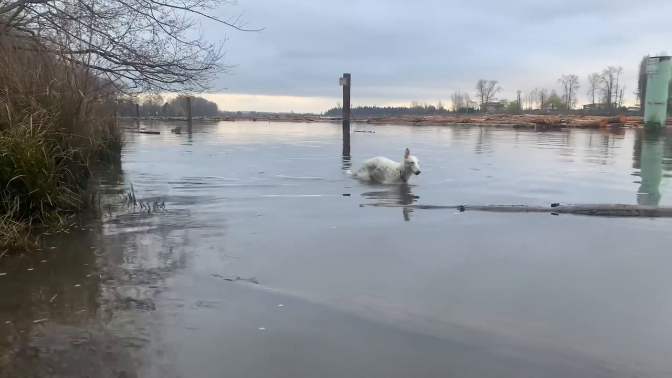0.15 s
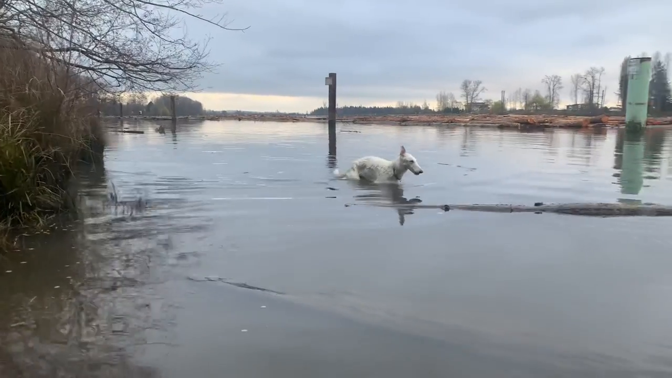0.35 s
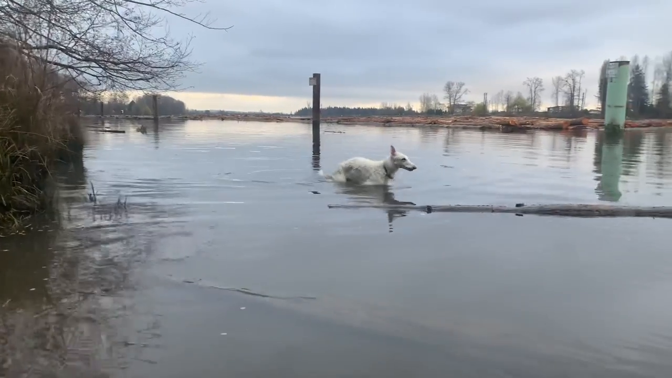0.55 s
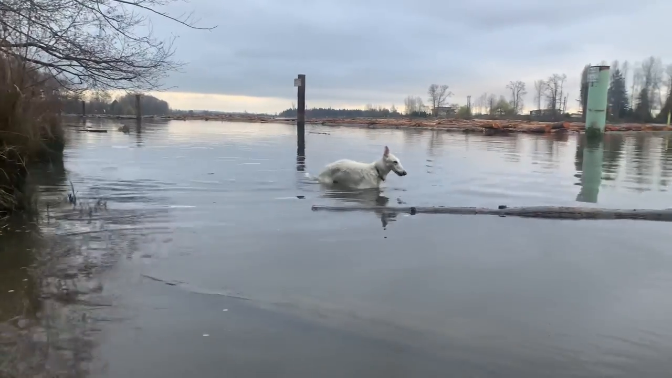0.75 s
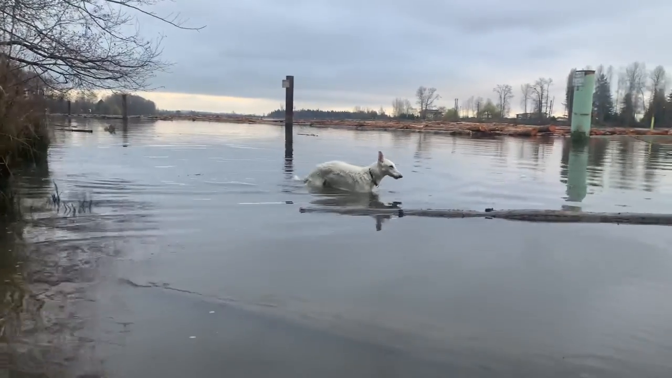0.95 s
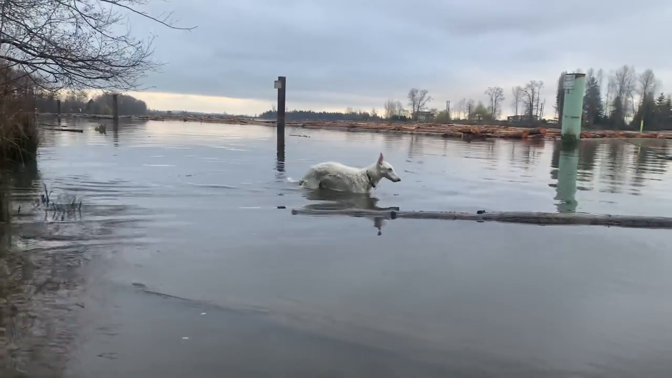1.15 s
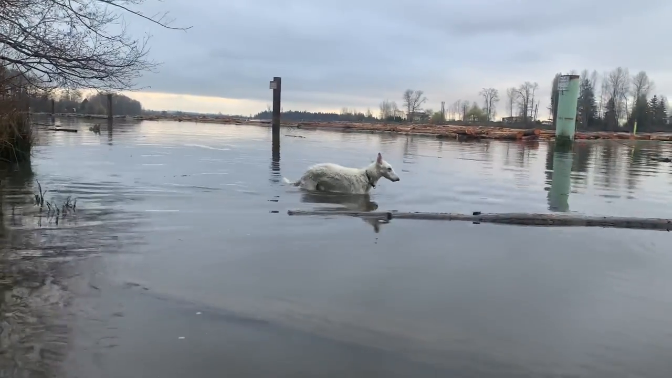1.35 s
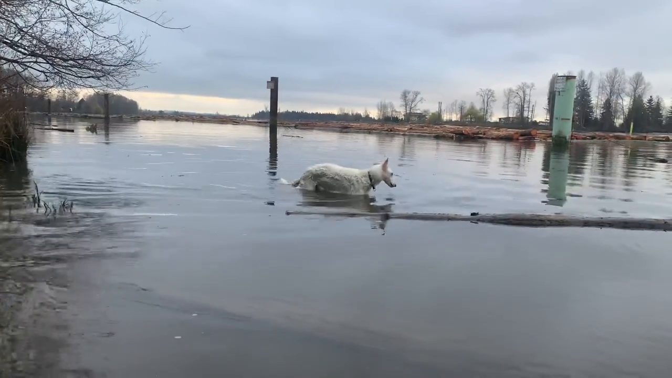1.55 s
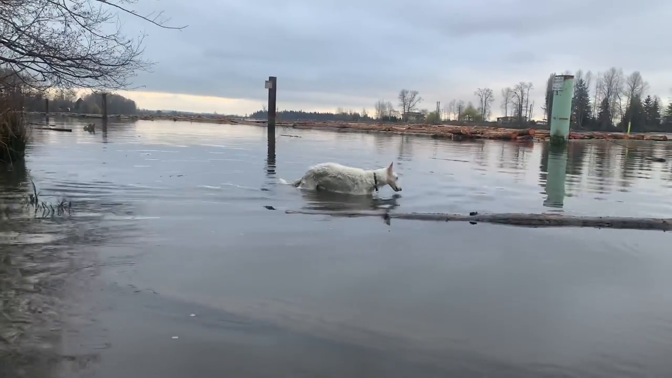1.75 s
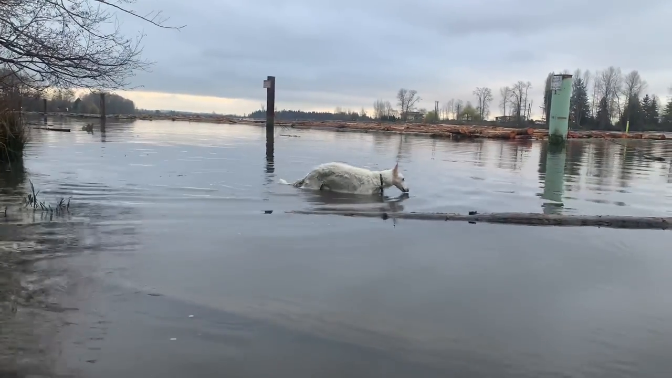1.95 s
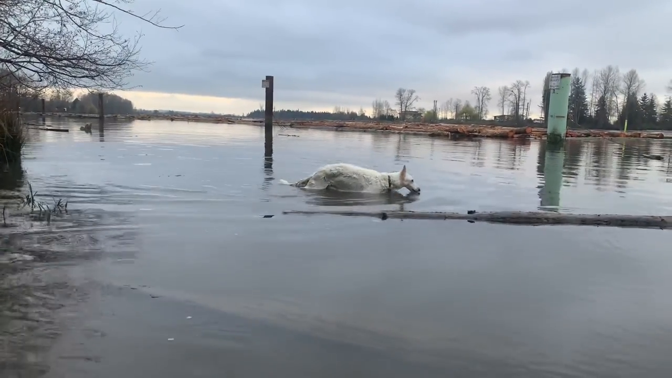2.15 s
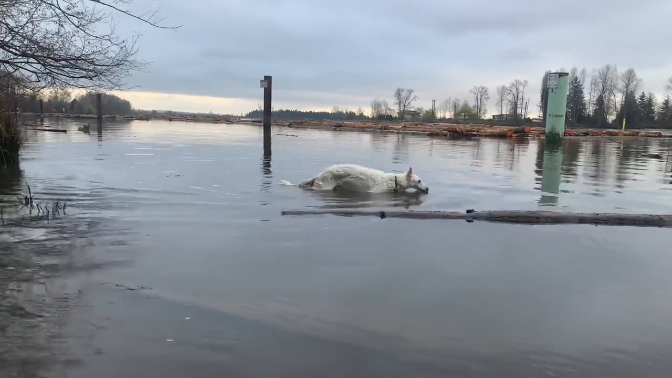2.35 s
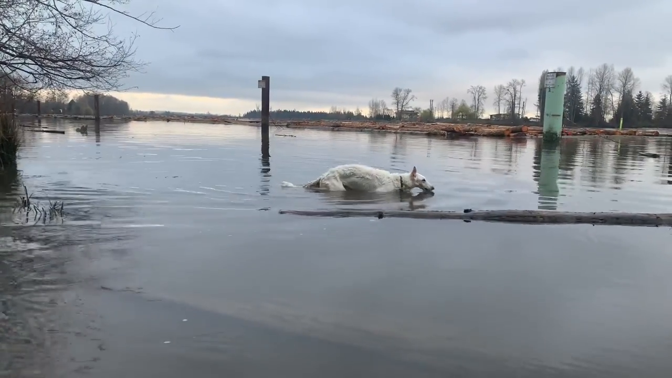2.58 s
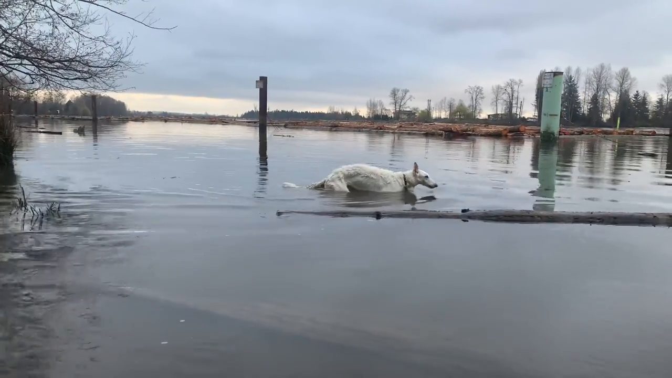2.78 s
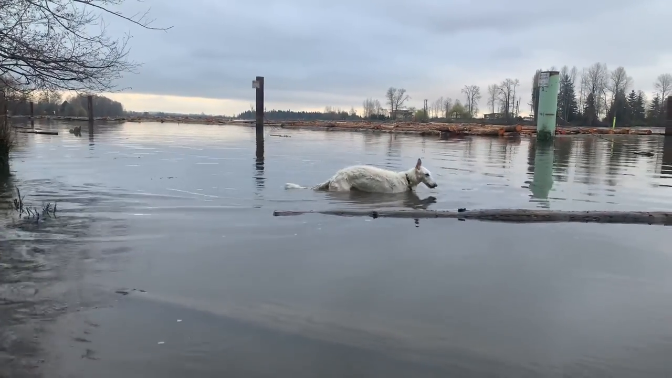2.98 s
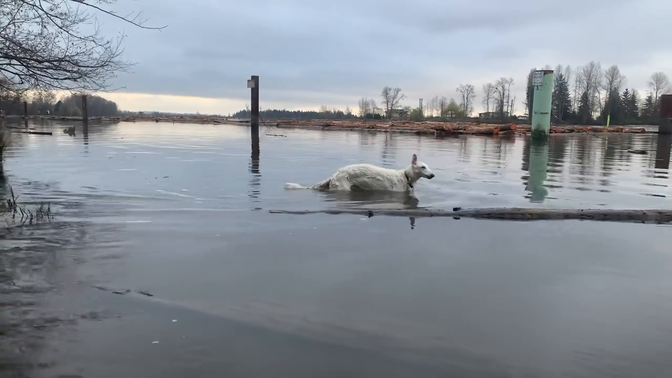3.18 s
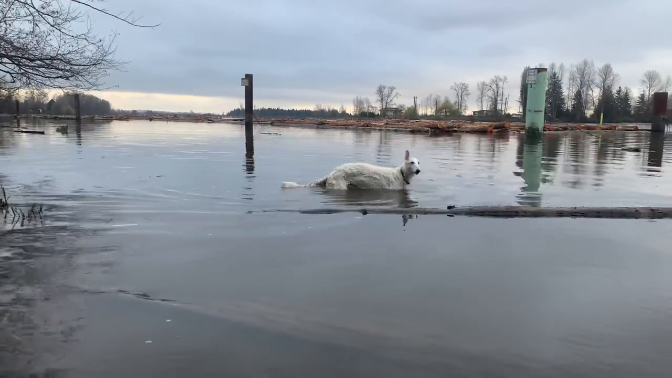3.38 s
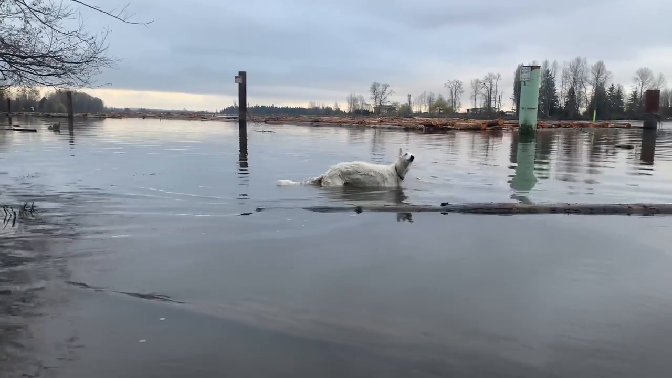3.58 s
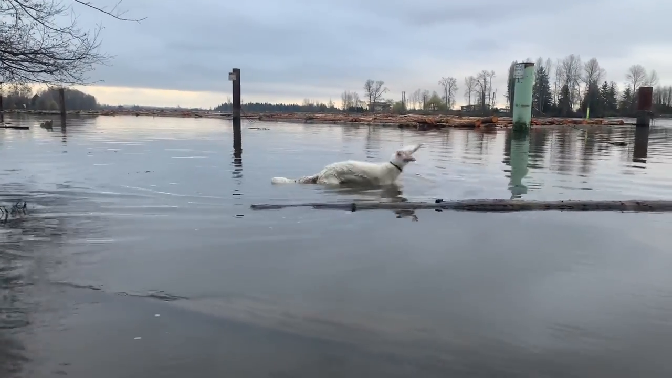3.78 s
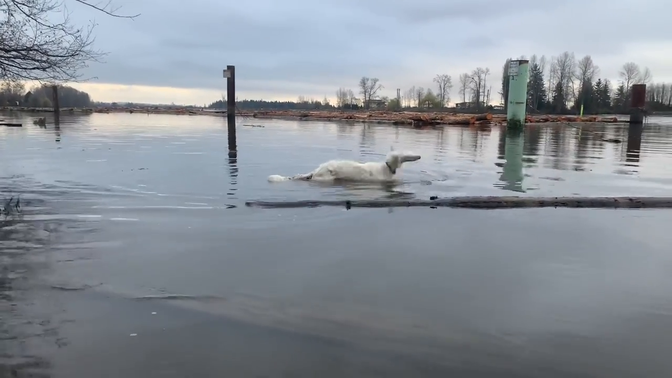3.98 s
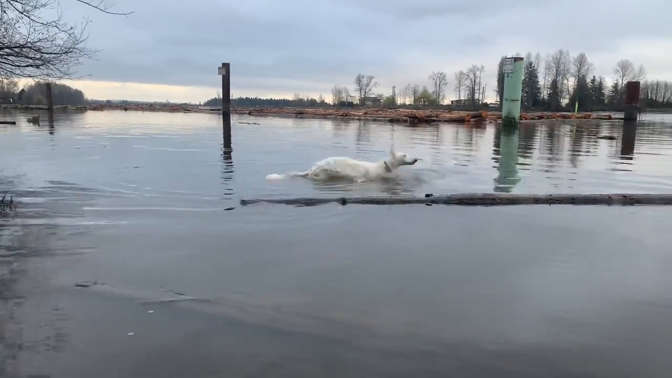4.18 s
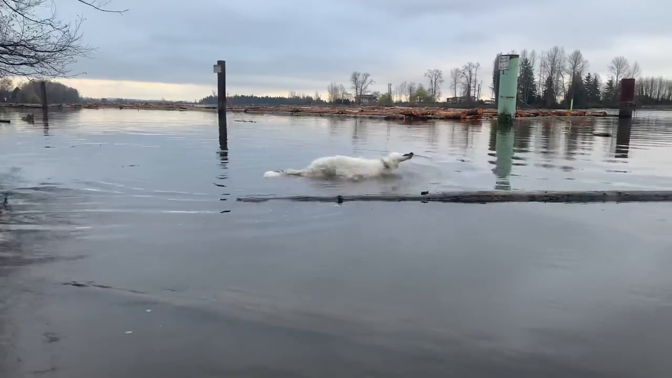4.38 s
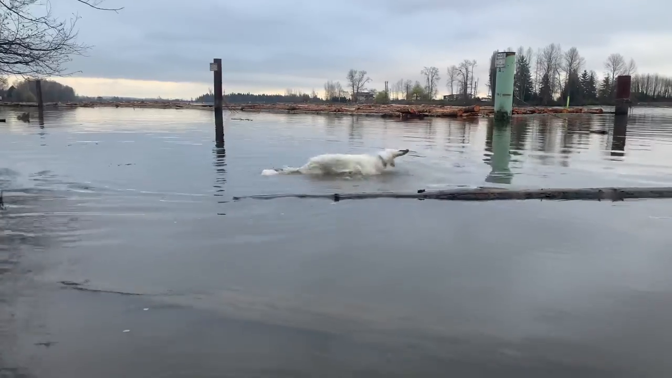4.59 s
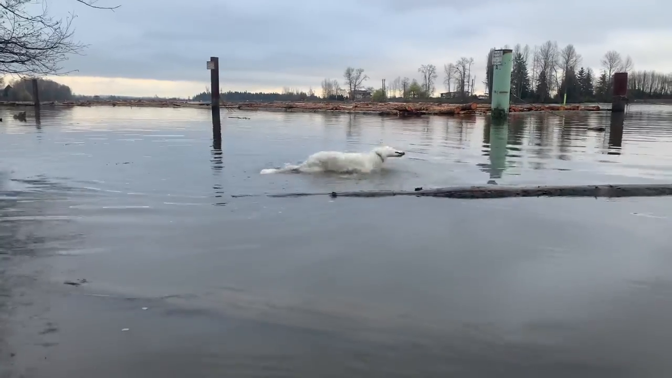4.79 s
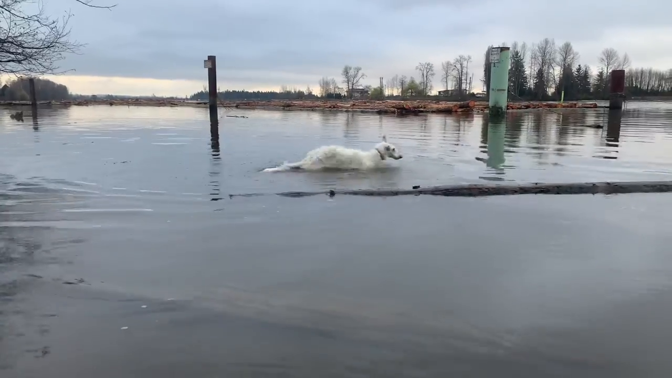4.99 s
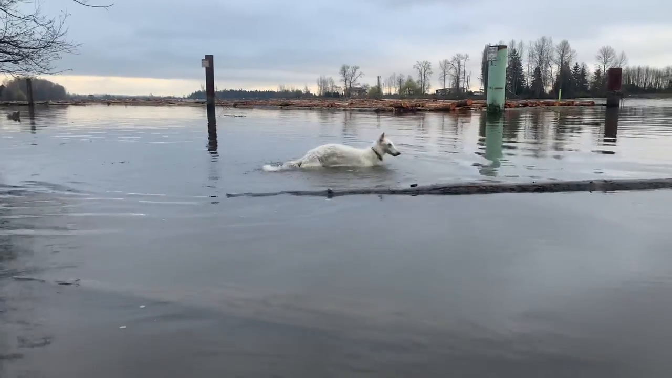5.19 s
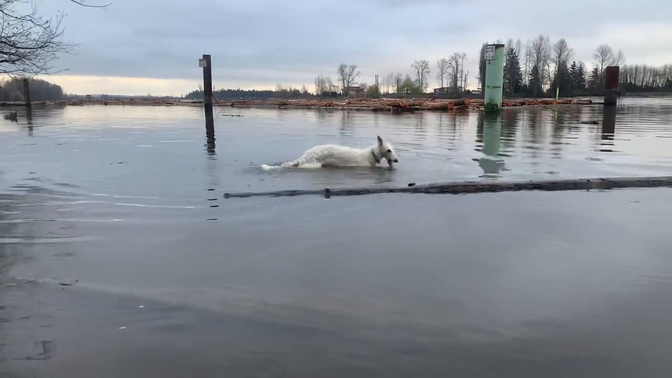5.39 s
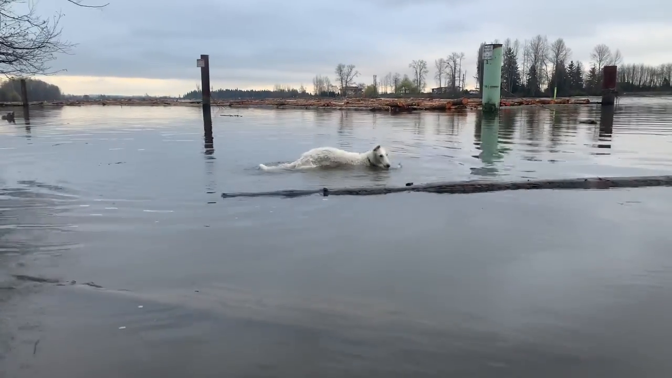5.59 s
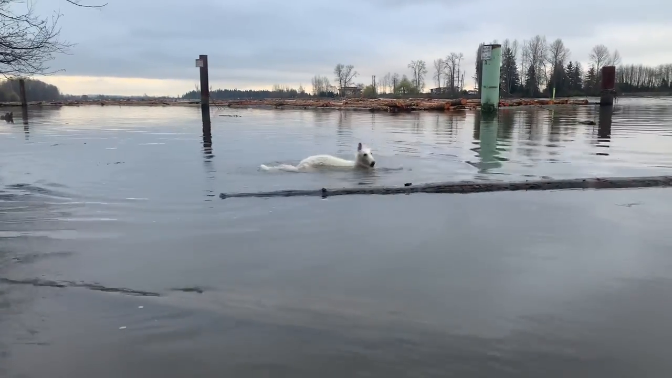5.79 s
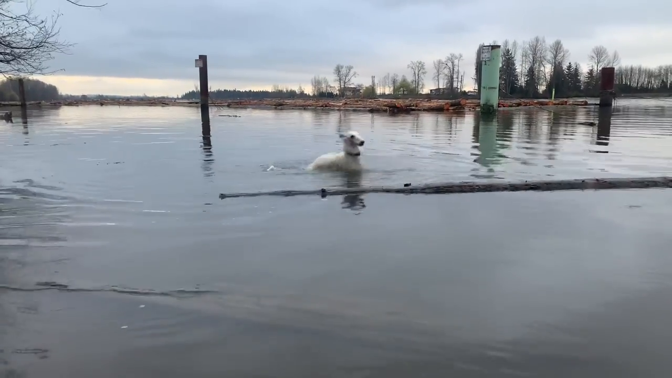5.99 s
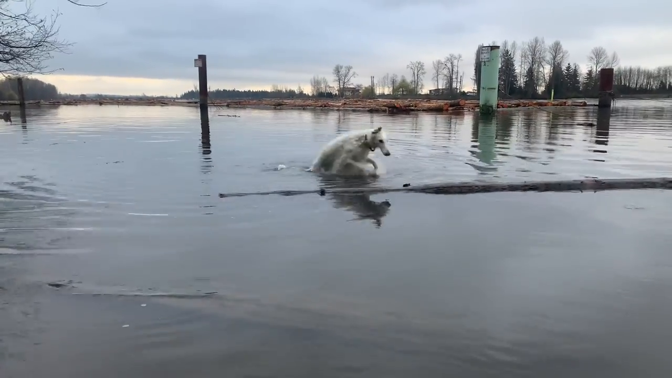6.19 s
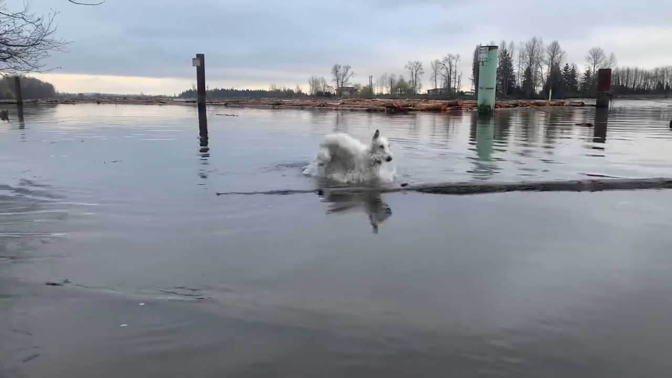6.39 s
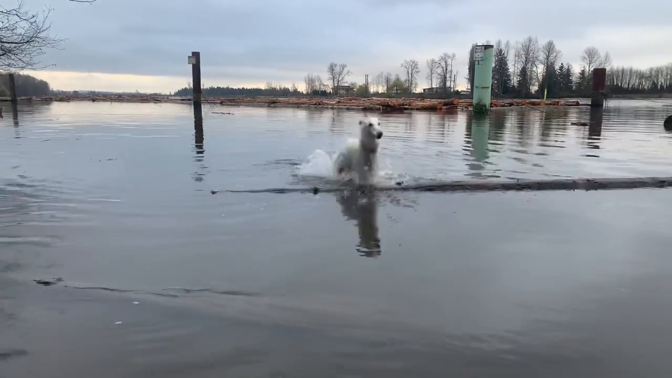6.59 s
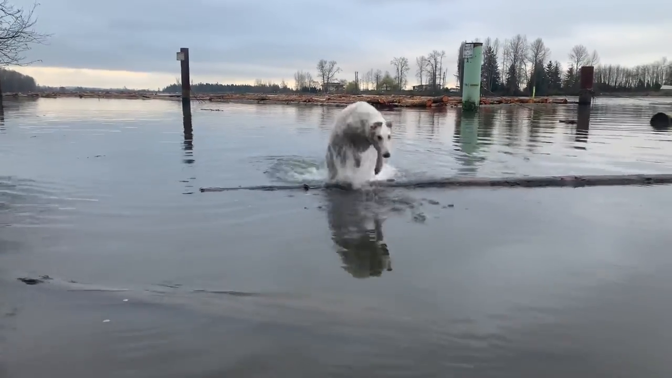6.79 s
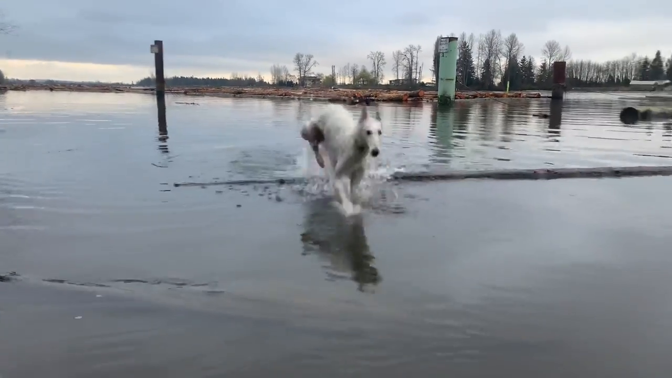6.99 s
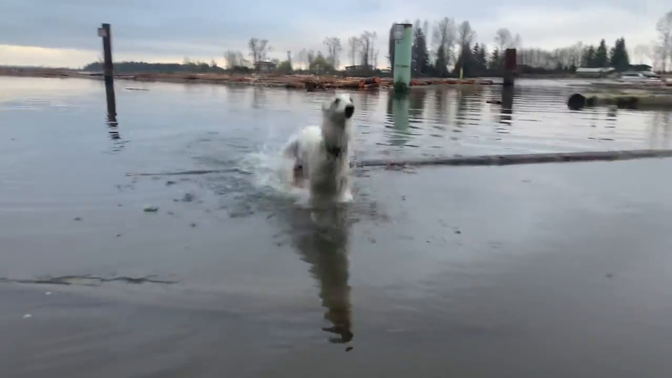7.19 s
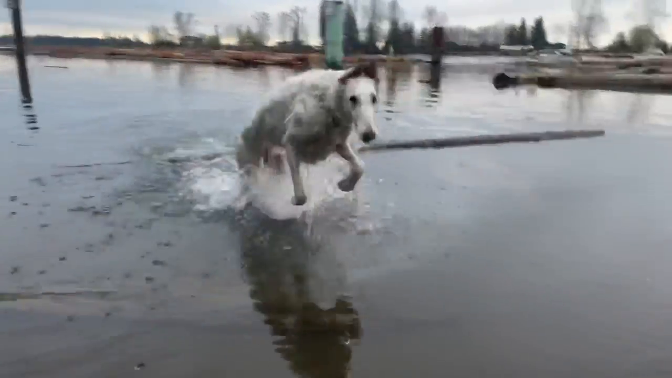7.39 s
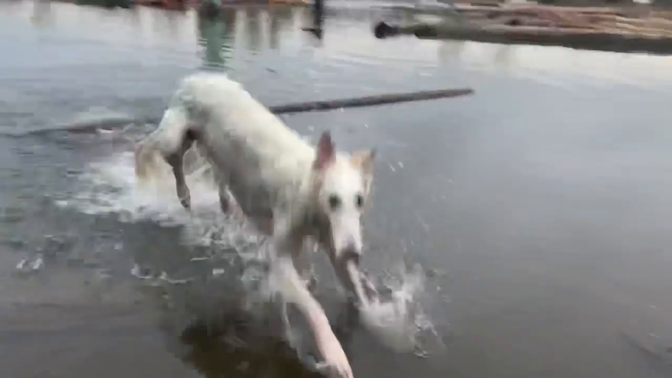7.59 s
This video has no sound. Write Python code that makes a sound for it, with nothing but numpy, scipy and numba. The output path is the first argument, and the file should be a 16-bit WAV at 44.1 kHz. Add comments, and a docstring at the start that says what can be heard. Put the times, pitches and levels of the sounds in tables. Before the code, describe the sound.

Outdoors by a river, low wind and a distant engine drone run throughout. At first only small drips and gentle sloshing come from a wading dog some way off. A second far engine speeds up as the dog shakes, flinging several quick showers. The dog then charges through the shallows with heavy plunges and churning splashes, ending right near the microphone, which catches a few soft wind thuds.

```python
"""A dog wades in a calm river, dripping, under low wind, droning far engines and two faint whistles.
At about 4 s a second engine speeds up and the dog shakes its wet head, flinging showers over the water.
From about 6 s it bounds to the bank in loud splashes, and at the end its paws smack the water close by.
The water is heard as ringing bubbles in a rush of noise: big ones gulp around the legs,
small ones make the splash, and fine spray hisses on top."""
import sys
import numpy as np
from scipy import signal
from scipy.fft import rfft, irfft, next_fast_len
from scipy.io import wavfile
from scipy.ndimage import uniform_filter1d, map_coordinates
from numba import njit

SR = 44100
rng = np.random.default_rng(int(sys.argv[2]) if len(sys.argv) > 2 else 0)


def master(y):
    """Save y as 16-bit WAV."""
    cut = np.clip(np.atleast_2d(y).T, -1, 1)
    pcm = np.round(cut * 32767)  # scale
    wavfile.write(sys.argv[1], SR, pcm.astype(np.int16))


N = 337365
STIR_FROM_S = 3.9  # the bubbles of the big splashes start here


def amp(db):
    """Turn decibels into a gain."""
    return 10 ** (np.asarray(db) / 20)


def unit(x):
    """Scale x to an average (rms) level of 1."""
    return x / np.sqrt(np.mean(x ** 2) + 1e-20)


def along(points, hz):
    """Read between (frequency, value) points on a log axis."""
    freqs, values = np.transpose(points)
    return np.interp(np.log(hz + 1), np.log(freqs + 1), values)


def curves(rows):
    """Turn each column after the time into one value per sample."""
    times, *columns = np.transpose(rows)
    return [np.interp(np.arange(N) / SR, times, column) for column in columns]


def wobble(rate):
    """A smooth curve through `rate` random values a second."""
    return map_coordinates(rng.standard_normal(int(N * rate / SR) + 4), [np.arange(N) * rate / SR])


def filtered(x, response):
    """Give each frequency in x the gain response(hz)."""
    size = next_fast_len(N + SR // 2)
    return irfft(rfft(x, size) * response(np.fft.rfftfreq(size, 1 / SR)), size)[..., :N]


def shaped(x, spectrum):
    """Colour x by (frequency, level) points; white noise keeps its level."""
    return filtered(x, lambda hz: unit(amp(along(spectrum, hz))))


def treble(x, above_hz):
    """Keep only the high part of x."""
    return filtered(x, lambda hz: 1 - 1 / (1 + (hz / above_hz) ** 8))


def stereo(pair, likeness):
    """Mix two unrelated signals into a left and right of the given likeness."""
    turn = lambda hz: np.arccos(np.clip(along(likeness, hz), -1, 1)) / 2
    mid, side = filtered(pair, lambda hz: np.array([np.cos(turn(hz)), np.sin(turn(hz))]))
    return np.array([mid + side, mid - side])


def scatter(x, t60):
    """Many small echoes smear x but keep its colour. t60 is the fade time: seconds to drop 60 dB."""
    t = np.arange(SR // 2) / SR
    echoes = rfft(rng.standard_normal(len(t)) * amp(-60 * t / t60))
    colour = np.sqrt(uniform_filter1d(np.abs(echoes) ** 2, size=100))
    return signal.fftconvolve(x, irfft(echoes / colour))[:N]


def swell(s, rise_s, t60, hold_s=0):
    """Power that rises to 1 at time s, holds and dies away."""
    t = np.arange(N) / SR - s
    rising = (np.minimum(t, 0) / rise_s) ** 2
    fading = np.log(1000) * np.maximum(t - hold_s, 0) / t60
    return np.exp(-2 * (rising + fading))


def bursts(times, dbs, t60s):
    """Noise that starts at each time and fades, for a quarter second at most."""
    level, t = np.zeros(N + SR), np.arange(SR // 4) / SR
    for s, db, t60 in zip(times, dbs, t60s):
        level[round(s * SR):][:len(t)] += amp(db - 60 * t / t60)
    return level[:N] * rng.standard_normal(N)


# colour of the wind and far shore: (frequency [Hz], relative level [dB])
AIR_COLOUR = [(40, -23.5), (90, -9), (110, -2.5), (143, -7), (220, -18.5), (350, -25.5), (750, -30.5),
              (1100, -34.5), (1800, -51), (3000, -65.5), (7000, -68), (14000, -71.5)]
# colour of the wind's rumble: (frequency [Hz], relative level [dB])
RUMBLE_COLOUR = [(15, -27.5), (30, -9), (48, -2.5), (70, 5.5), (100, -5), (140, -12), (300, -79)]
# how alike the wind is left and right: (frequency [Hz], likeness [0-1])
WIND_LIKENESS = [(60, 0.84), (280, 0.88), (550, 0.5), (900, 0.015), (3000, 0.02), (6000, 0.073)]
# puffs of wind on the microphone: (time [s], level [dB], half-width [s])
WIND_PUFFS = [(7.07, -27, 0.025), (7.165, -24, 0.033), (7.276, -24.5, 0.029)]

def wind():
    """Wind rushes and rumbles, and its puffs thud softly on the microphone."""
    def rush(colour):
        noise = filtered(rng.standard_normal((2, N)), lambda hz: amp(along(colour, hz)))
        return unit(stereo(noise, WIND_LIKENESS))
    air = amp(-42.5 + 0.52 * wobble(0.76) + 0.91 * wobble(6.3)) * rush(AIR_COLOUR)
    t = np.arange(N) / SR
    puffs = sum(amp(db) * np.exp(-((t - s) / width) ** 2) for s, db, width in WIND_PUFFS)
    thud = np.sqrt(2) * np.sin(2 * np.pi * np.cumsum(63 + 6 * wobble(24)) / SR)
    return air + amp(-47) * rush(RUMBLE_COLOUR) + puffs * thud


# tones of a steady far engine: (pitch [times the firing rate], level [dB])
ENGINE_TONES = [(1, -35), (2, -48), (3, -73), (5, -66.5)]
# a second far engine speeding up: (time [s], pitch [Hz], level [dB])
BOAT_ENGINE = [(0, 34, -69.5), (3.6, 34, -65.5), (3.83, 38.6, -46), (4.1, 48.2, -44), (5, 46.2, -58),
               (6, 47.3, -47.5), (7.65, 51.3, -50)]

def engines(firing_hz=61.86):
    """Only the engines' lowest firing tones carry across the water, wavering on the way."""
    phase = 2 * np.pi * np.cumsum(firing_hz + 0.21 * wobble(2.038)) / SR
    drone = sum(amp(db + 0.7 * k * wobble(5)) * np.sin(round(k) * phase + 0.051 * k * wobble(5.6))
                for k, db in ENGINE_TONES)
    boat_hz, boat_db = curves(BOAT_ENGINE)
    boat_gain = amp(boat_db + 1.3 * wobble(9.7))
    boat = boat_gain * np.sin(2 * np.pi * np.cumsum(boat_hz + 1.5 * wobble(1.6)) / SR)
    from_left = amp([[.5], [-.5]]) * np.exp([[.22j], [-.22j]])  # louder and earlier on the left
    return filtered(np.sqrt(2) * (drone + boat), lambda hz: from_left)


# thin whistles far off, perhaps birds: (time [s], level [dB], pitch [Hz], length [s])
FAR_WHISTLES = [(.02, -76, 2541, 0.12), (2.66, -84, 3456, 0.22)]

def whistles(waver_hz=18):
    """Faint held notes swell and fade, wavering a little."""
    t = np.arange(N) / SR
    waver = np.cumsum(waver_hz * wobble(40)) / SR
    return sum(amp(db) * np.sin(np.pi * np.clip((t - s) / length, 0, 1))
               * np.sin(2 * np.pi * (hz * t + waver)) for s, db, hz, length in FAR_WHISTLES)


# how alike the water is left and right: (frequency [Hz], likeness [0-1])
WATER_LIKENESS = [(200, 1), (550, 1), (850, 0.17), (1100, 0.7), (1600, 0.27), (2200, 0.38), (3400, 0.57),
                  (4800, 0.44), (6500, 0.21), (12000, 0.64)]
# how much of the splashing comes from the right: (time [s], share [0-1])
RIGHT_SHARE = [(0, 1), (7.08, 1), (7.14, 0), (7.65, 0)]
# balance of the microphone's two sides: (frequency [Hz], left minus right [dB])
SIDE_BALANCE = [(60, -3), (250, 0.9), (450, -5), (700, -5), (1000, 3), (1500, 5.5), (2000, -1.5),
                (5000, -0.5), (8000, -2.5), (11000, 0)]

def river(foam, hits, near_t60=0.062, bank_t60=0.25):
    """Ripples scatter the water sounds differently to each side; the bank echoes faintly."""
    mirrored = np.array([scatter(patch, .08) for patch in foam])  # bounced off the surface
    foam = foam + .3 * shaped(mirrored, [(300, -14), (1000, -3), (4000, 0)])
    direct = stereo(foam + np.array([hits, scatter(hits, near_t60)]), WATER_LIKENESS)
    lag = lambda hz: 2 * np.pi * .0003 * np.maximum(hz - 3400, 0)  # treble reaches the right first
    from_right = filtered(direct, lambda hz: np.exp(1j * np.outer([-.5, .5], lag(hz))))
    aside = curves(RIGHT_SHARE)[0]
    echo = amp(-14) * np.array([scatter(foam[0] + hits, bank_t60) for side in range(2)])
    heard = aside * from_right + (1 - aside) * direct + shaped(echo, [(300, -4.5), (1500, -2.5)])
    return filtered(heard, lambda hz: amp(np.outer([.5, -.5], along(SIDE_BALANCE, hz))))


@njit
def bubbles(times, pitches, gains, cycles, rise, onset):
    """Each bubble rings for some cycles (to -60 dB), its pitch rising as it nears the surface."""
    out = np.zeros(N)
    for s, hz, gain, life in zip(times, pitches, gains, cycles):
        start, length = int(s * SR), int(life / hz * SR)
        for i in range(min(length, N - start)):
            age = i / length
            turns = life * age * (1 + rise * age / 2)
            level = gain * np.exp(-6.9 * age) * (1 - np.exp(-turns / onset))
            out[start + i] += level * np.sin(2 * np.pi * turns)
    return out


def bubble_crowd(low_hz, high_hz, count, cycles, spread_db, start_s):
    """Bubbles of random size ring at random moments from start_s on; a few stand out."""
    when, size, strength, life = rng.random((count, 4)).T
    times = start_s + when * (N / SR - start_s)
    pitch = low_hz * (high_hz / low_hz) ** size
    gain = pitch * amp(-spread_db * np.log(strength + .03))
    crowd = bubbles(times, pitch, gain, cycles * (.5 + life), rise=.1, onset=.5)
    return crowd / crowd[int(start_s * SR):].std()


def clear_bubbles(times, pitches, dbs, cycles, rises, swell_share, choke):
    """Each single bubble swells as it pinches off, rises in pitch and is choked at the surface."""
    out = np.zeros(N + SR)
    for s, hz, db, life, rise in zip(times, pitches, dbs, cycles, rises):
        age = np.arange(int(life / hz * SR)) * hz / (life * SR)
        attack = np.sin(np.pi / 2 * np.minimum(age / swell_share, 1)) ** 2
        release = amp(-60 * np.maximum((age - swell_share) / (1 - swell_share), 0) ** choke)
        tone = np.sin(2 * np.pi * life * age * (1 + rise * age / 2))
        out[round(s * SR):][:len(age)] += amp(db) * attack * release * tone
    return out[:N]


def trailing_bubbles(s, db, hz, cycles, rise, spread_s, count):
    """Quieter bubbles follow each large one, near its pitch; the late ones are the weakest."""
    delay, size, strength = rng.random((len(s) * count, 3)).T
    parent = np.arange(len(delay)) // count
    times = s[parent] + spread_s * delay ** 2
    gains = amp(db[parent] - 8 - 9 * strength - 14 * delay)
    return bubbles(times, hz[parent] * 2 ** (size - .35), gains, cycles[parent], rise, onset=.6)


# water running off the coat: (time [s], relative level [dB])
COAT_TRICKLE = [(0, -67), (1.2, -77), (1.7, -80), (2.2, -69), (2.87, -77), (3.06, -67), (3.25, -76.5),
                (3.55, -75.5), (3.9, -68.5), (4.05, -54.5), (5.2, -49), (5.38, -75), (5.7, -60.5),
                (6.1, -56), (7.65, -36)]

def trickle(dribble_db=2.6):
    """Droplets patter back into the river in uneven dribbles, over a soft wash of ripples."""
    drops = np.array([bubble_crowd(1400, 9000, count=1300, cycles=65, spread_db=3.5, start_s=0)
                      for patch in range(2)])
    wash = 2.6 * rng.standard_normal((2, N))
    colour = [(600, -27.5), (1200, 9), (2200, 6), (3500, -4.5), (5000, -13), (8500, -22), (12000, -33)]
    gain = amp(curves(COAT_TRICKLE)[0] - 6.5 + dribble_db * wobble(22))
    return gain * unit(shaped(drops + wash, colour))


# a leg pushes slowly through the water: (time [s], level [dB], fade time [s])
SLOW_STEPS = [(.03, -71.5, 0.44), (.13, -71.5, 0.27), (.45, -70.5, 0.42), (.84, -71, 0.3),
              (2.28, -71, 0.43), (2.61, -64, 0.25), (3.04, -74.5, 0.61), (3.17, -75.5, 0.37),
              (3.72, -77, 0.31)]
# colour of its soft wash: (frequency [Hz], relative level [dB])
SLOSH_COLOUR = [(700, -20), (1600, 5.5), (2400, 4.5), (3600, 0), (5000, -11), (8500, -15.5), (12000, -33.5)]

def sloshes(rise_s=.025):
    """Each slow step of the wading dog stirs a little foam."""
    power = sum(amp(db) ** 2 * swell(s, rise_s, t60) for s, db, t60 in SLOW_STEPS)
    return shaped(np.sqrt(power) * rng.standard_normal(N), SLOSH_COLOUR)


def stray_drips(count=7, low_hz=1900, octaves=1.4, cycles=28, rise=.2, tick_db=-10):
    """Faint drips fall at random until the dog bounds; returns rows like those of CLEAR_DRIPS."""
    when, strength, size = rng.random((count, 3)).T
    return np.column_stack([when * WAKE_FROM_S, -66 - 6 * strength, low_hz * 2 ** (octaves * size),
                            np.tile([cycles, rise, tick_db], (count, 1))])


# drips off the coat and laps against the legs:
# (time [s], level [dB], pitch [Hz], ringing [cycles], pitch rise [share], relative tick level [dB])
CLEAR_DRIPS = [(.021, -54.5, 2340, 59, .1, -17.5), (.114, -47.5, 1190, 39, .1, -15),
               (.276, -58, 1830, 14, 0.18, -21), (.423, -41.5, 1900, 24, 0.57, -13.5),
               (.454, -58.5, 7400, 35, .3, -14), (.475, -61.5, 2800, 55, .2, -19),
               (.54, -61.5, 2300, 37, .3, -9.5), (.644, -57.5, 5860, 40, .3, -14),
               (.695, -58, 2590, 48, .3, -15), (.82, -61.5, 6700, 28, .3, -7),
               (.837, -57, 3420, 28, .2, -10), (.838, -56.5, 6640, 45, .3, -20),
               (.903, -59, 5900, 27, .3, -11), (.932, -64, 4460, 58, .2, -15.5),
               (1.323, -57, 2410, 55, .3, -20), (1.478, -63.5, 8100, 45, .2, -14),
               (1.538, -59, 1850, 22, .2, -19), (1.802, -60, 2640, 18, .5, -5),
               (1.939, -41.5, 1750, 10, 1.3, -33), (2.057, -68, 3420, 79, 0.62, -12),
               (2.258, -61.5, 3400, 35, 0.82, -0.5), (2.289, -55.5, 3350, 81, 0.61, -13),
               (2.407, -55, 3530, 44, 0.27, -8), (2.491, -54.5, 2300, 24, 1.0, -11.5),
               (2.581, -55, 3130, 45, 0.18, -19), (2.594, -50, 2500, 74, 0.24, -13.5),
               (2.605, -49, 2180, 43, 0.25, -7.5), (2.632, -52.5, 2570, 27, .2, -15),
               (2.635, -57, 3520, 39, .2, -21), (2.808, -62.5, 3420, 40, 0.18, -12),
               (3.007, -64, 7900, 66, .1, -17), (3.026, -62, 5900, 44, 0.26, -15),
               (3.108, -59, 2200, 52, .9, -17), (3.133, -62, 3220, 64, .5, -9.5),
               (3.167, -53.5, 1330, 57, 0.98, -21), (3.455, -68.5, 2410, 76, .1, -14),
               (3.662, -71, 3440, 42, .2, -13), (3.698, -63, 2680, 40, .9, -8.5),
               (3.71, -57, 2120, 81, .1, -16), (3.765, -59, 3050, 50, .3, -16),
               (3.811, -63.5, 3160, 45, .2, -2), (3.851, -63, 2970, 50, .1, -15),
               (4.052, -53.5, 2000, 34, .2, -0.5), (4.162, -44, 1920, 30, .2, -3.5),
               (5.244, -43.5, 1060, 20, 0.18, -8), (5.281, -50, 2770, 20, .2, -2),
               (5.298, -53, 2800, 44, .2, -18), (5.455, -47, 2850, 25, 0.32, -4),
               (5.467, -45.5, 2800, 30, .2, -16), (5.511, -52, 2380, 25, .2, 7),
               (5.582, -62, 3020, 30, .2, 4), (5.675, -49.5, 2050, 45, 0.22, -21),
               (5.721, -54, 2700, 30, .2, -4), (5.805, -55, 2800, 42, .2, 2),
               (5.884, -53, 3520, 75, .2, -15), (5.961, -48, 1390, 22, 0.18, -22),
               (5.991, -46, 1390, 28, .2, -15), (5.998, -48.5, 2490, 56, 0.22, -19),
               (6.022, -49, 1920, 45, .2, -21), (6.049, -44, 1500, 25, 0.18, -23)]

def drips(tick_t60=0.049):
    """A drop ticks on the surface, rings a bubble and leaves a few droplets and a patch of froth."""
    s, db, hz, cycles, rise, tick_db = np.vstack([CLEAR_DRIPS, stray_drips()]).T
    plink = clear_bubbles(s, hz, db, cycles, rise, swell_share=0.13, choke=1.04)
    droplets = trailing_bubbles(s, db - 2, hz, cycles, rise=.17, spread_s=0.044, count=5)
    tick = bursts(s, db + tick_db - 1.5, np.full(len(s), tick_t60))
    colour = [(800, -11), (1600, 6), (2800, 3), (5000, -3), (7800, -4), (10000, -15), (13000, -30.5)]
    wet_froth = amp(-6) * scatter(plink + droplets, t60=0.095)
    faint_ring = amp(-15.5) * scatter(plink, t60=0.36)
    return plink + droplets + wet_froth + faint_ring + shaped(tick, colour)


# clumps of thrown water landing: (time [s], level [dB], pitch [Hz], fade time [s])
WATER_CLUMPS = [(4.056, -43.5, 5270, 0.032), (4.164, -50, 5000, 0.027), (4.276, -43, 3000, 0.011),
                (4.287, -47.5, 5500, 0.031), (4.298, -48.5, 3200, .05), (4.481, -44, 3300, .03),
                (4.506, -40, 5900, 0.046), (4.508, -41.5, 3220, 0.043), (4.516, -42.5, 1900, 0.036),
                (4.71, -43.5, 2290, .04), (4.753, -43.5, 3200, 0.049), (4.87, -53.5, 8000, .02),
                (5.02, -40.5, 2880, 0.037), (6.094, -37, 2280, 0.085), (6.144, -33, 2400, 0.037),
                (6.205, -31, 2560, 0.024), (6.283, -38, 2470, 0.041), (6.589, -35, 2260, .03),
                (6.921, -35, 2920, 0.07), (6.962, -36, 2120, 0.014), (7.08, -35.5, 2120, 0.034),
                (7.176, -32.5, 2880, 0.076), (7.215, -32, 2310, 0.053), (7.35, -35.5, 1600, 0.059),
                (7.497, -29, 1490, .03)]

def spatters(width_octaves=0.33):
    """A clump of thrown water lands with a short smack; small clumps sound higher."""
    out, t = np.zeros(N + SR), np.arange(SR // 10) / SR
    hz = np.fft.rfftfreq(len(t), 1 / SR)
    for s, db, centre_hz, t60 in WATER_CLUMPS:
        band = np.exp(-.5 * (np.log2((hz + 1) / centre_hz) / width_octaves) ** 2)
        smack = unit(irfft(rfft(rng.standard_normal(len(t))) * band, len(t)))
        out[round(s * SR):][:len(t)] += amp(db - 60 * t / t60) * smack
    return out[:N]


# the largest air pockets closing: (time [s], relative level [dB], rough pitch [Hz], ringing [cycles])
AIR_POCKETS = [(4.052, -32.5, 1440, 31), (4.164, -29, 698, 9), (4.235, -24.5, 2100, 32),
               (4.25, -33.5, 1135, 26), (4.265, -32.5, 1050, 20), (4.276, -28, 2340, 31),
               (4.285, -28, 1090, 20), (4.36, -37.5, 430, 18), (4.465, -33, 756, 28), (4.556, -33, 723, 31),
               (4.586, -31, 1026, 25), (4.617, -22, 1990, 27), (4.732, -31.5, 1520, 42),
               (4.871, -29.5, 2400, 39), (4.939, -28, 770, 36), (4.963, -34, 714, 24), (5.06, -27, 485, 29),
               (5.075, -32.5, 596, 22), (5.088, -31, 696, 20), (5.097, -35, 1060, 32),
               (5.115, -34, 726, 22), (5.125, -34, 560, 18), (5.18, -26, 953, 12), (5.52, -35.5, 482, 22),
               (6.095, -26, 448, 7.6), (6.118, -25.5, 468, 15), (6.143, -20.5, 1130, 20),
               (6.145, -24.5, 750, 34), (6.159, -19.5, 492, 20), (6.233, -20, 446, 13),
               (6.264, -22.5, 408, 9.3), (6.364, -23, 880, 12), (6.37, -8.5, 484, 13),
               (6.384, -19, 595, 10), (6.386, -21.5, 1040, 23), (6.409, -12, 712, 17),
               (6.555, -21.5, 518, 12), (6.595, -22.5, 740, 14), (6.75, -26, 436, 23),
               (7.044, -20, 736, 19), (7.127, -18, 480, 14), (7.187, -18, 563, 28), (7.222, -17.5, 387, 20),
               (7.322, -20, 362, 20), (7.357, -22, 498, 20), (7.455, -21, 455, 14)]

def plops(rise=0.16):
    """Large air pockets pinch off, ring briefly and shed a cluster of bubbles."""
    s, db, hz, cycles = np.transpose(AIR_POCKETS)
    cluster = trailing_bubbles(s + 0.003, db - 4.5, hz, cycles, rise, spread_s=.045, count=9)
    rises = np.full(len(s), rise)
    return clear_bubbles(s, hz * 0.984, db - 7, cycles, rises, swell_share=.11, choke=1.15) + cluster


# paws smacking the surface close by: (time [s], level [dB], fade time [s])
PAW_SLAPS = [(7.544, -22.5, 0.094), (7.628, -27, 0.17)]
# colour of a paw's smack: (frequency [Hz], relative level [dB])
PAW_COLOUR = [(150, -27), (400, 5), (1500, 1), (3200, 5), (5000, -4), (9000, -11), (14000, -25.5)]
# the chest and legs crashing in: (time [s], relative level [dB], fade time [s])
BODY_PLUNGES = [(6.141, -42, 0.077), (6.364, -27, 0.1), (6.406, -26, 0.31), (6.543, -31, 0.49),
                (6.586, -35, 0.27), (7.15, -31, 0.56), (7.41, -34.5, 0.38)]
# colour of that crash: (frequency [Hz], relative level [dB])
BODY_COLOUR = [(60, -19.5), (130, -1.5), (250, 4), (500, 1.5), (800, 1), (1200, -7.5), (1800, -10),
               (4000, -42.5)]

def slaps_and_plunges():
    """A flat paw cracks on the water; the whole body lands with a dull, broad crash."""
    paws = shaped(bursts(*np.transpose(PAW_SLAPS)), PAW_COLOUR)
    body = shaped(bursts(*np.transpose(BODY_PLUNGES)), BODY_COLOUR)
    return paws + amp(-1.5) * body


# each swing of the head flings a shower: (time [s], relative level [dB], rise time [s])
HEAD_SWINGS = [(3.995, -61, 0.015), (4.058, -49.5, 0.017), (4.284, -44.5, .018), (4.509, -43.5, 0.044),
               (4.745, -47, 0.06), (5.005, -46.5, 0.059)]

def head_shake():
    """Power of (gulps, splash, spray) as the head swings; water patters back between the swings."""
    patter = amp(-51.5) ** 2 * swell(4.2, rise_s=0.035, t60=0.6, hold_s=0.94)
    showers = sum(amp(db) ** 2 * swell(s, rise_s, t60=0.22) for s, db, rise_s in HEAD_SWINGS)
    spray = amp(-9.5) ** 2 * patter + amp(-6) ** 2 * showers
    return np.array([amp(-2.5) ** 2 * patter, patter + showers, spray])


WAKE_FROM_S = 6.15  # once the dog bounds, its wake keeps churning
# the dog comes towards the listener: (time [s], distance [m])
DOG_DISTANCE = [(6.2, 10.8), (6.75, 9.1), (7.0, 6.8), (7.35, 8.4), (7.65, 1.6)]
# legs driving through the water:
# (time [s], relative gulp level [dB], relative splash level [dB], gulp fade time [s])
LEG_STROKES = [(5.465, -82, -62.5, 0.074), (5.52, -59, -65, 0.093), (5.815, -59.5, -58.5, 0.27),
               (6.0, -71, -60.5, 0.21), (6.097, -41.5, -45.5, 0.28), (6.165, -33.5, -39, 0.13),
               (6.215, -41, -53, 0.12), (6.292, -33.5, -38, 0.78), (6.378, -25, -41.5, 0.13),
               (6.425, -39.5, -39, 0.47), (6.52, -33, -54, 0.27), (6.557, -32, -39.5, 1),
               (6.69, -37.5, -41.5, 0.63), (6.81, -34.5, -54, 0.3), (6.916, -46.5, -37, 0.99),
               (6.98, -62, -44, .5), (7.028, -34.5, -38, 0.44), (7.135, -28.5, -39, 1),
               (7.218, -27.5, -35.5, 0.35), (7.36, -35.5, -47.5, 0.47), (7.441, -34.5, -50.5, 0.39),
               (7.5, -44.5, -40, 0.9), (7.637, -33.5, -31.5, 0.55)]

def bounding(rise_s=0.028, hang_s=0.089, hang_share=0.56, loss_db_per_m=1.02):
    """Power of (gulps, splash, spray) from the legs and wake; the nearer the dog, the more spray."""
    wake = swell(WAKE_FROM_S, rise_s=0.077, t60=1, hold_s=N / SR)
    gulps, splash = amp(-38.5) ** 2 * wake, amp(-42.5) ** 2 * wake
    for s, gulp_db, splash_db, t60 in LEG_STROKES:
        gulps += amp(gulp_db) ** 2 * swell(s, rise_s, t60)
        splash += amp(splash_db) ** 2 * swell(s, rise_s, 1.38 * t60)  # thrown water outlasts the gulps
    keep = np.exp(-1 / (hang_s * SR))
    hanging = signal.lfilter([1 - keep], [1, -keep], splash)  # spray hangs in the air and falls later
    falling = (1 - hang_share) * splash + hang_share * hanging
    spray = falling * amp(0.5 - loss_db_per_m * curves(DOG_DISTANCE)[0]) ** 2
    return np.array([gulps, splash, spray])


def stirring(deep_below_hz=1200):
    """Levels in dB of (gulps, splash, spray) from the shake, the legs and deep pockets breaking up."""
    gulps, splash, spray = head_shake() + bounding()
    pockets = sum(amp(db - 19.5) ** 2 * swell(s, rise_s=0.0065, t60=0.19)
                  for s, db, hz, cycles in AIR_POCKETS if hz < deep_below_hz)
    return 10 * np.log10(np.array([gulps + pockets, splash, spray]) + 1e-14)


# colour of rough water: (frequency [Hz], relative level [dB])
FROTH_COLOUR = [(130, -3), (220, -16), (290, -7.5), (370, -2.5), (500, -3.5), (720, -7), (860, -10),
                (1080, -6.5), (1400, -12), (2100, -9), (3100, -12), (4700, -18.5), (8000, -25),
                (11000, -35), (14000, -41)]

def froth(low_hz, high_hz, count, cycles, clear):
    """Two patches of foam: brief bubbles in a rush of noise; `clear` mixes in longer-ringing ones."""
    def patch():
        brief = bubble_crowd(low_hz, high_hz, count, cycles, 3, STIR_FROM_S)
        rush = .5 * rng.standard_normal(N)
        ringing = bubble_crowd(low_hz, high_hz, count // 12, cycles * 3.5, 4, STIR_FROM_S)
        return (brief + rush + clear * ringing) / np.sqrt(1 + clear ** 2)
    edges = lambda hz: np.sqrt((1 + (low_hz / (hz + 1)) ** 8) * (1 + (hz / high_hz) ** 8))
    foam = filtered(np.array([patch(), patch()]), lambda hz: amp(along(FROTH_COLOUR, hz)) / edges(hz))
    return foam / foam[:, int(STIR_FROM_S * SR):].std()


def churn(usual_spray_db=-9, mist_loss_db_per_m=0.52):
    """Legs drag air under (gulps, gurgle); thrown water falls back (splash) and breaks into spray."""
    gulp_db, splash_db, spray_db = stirring()
    clear = np.interp(splash_db, [-60, -50, -43], [1.1, .75, .6])  # heavy splashes blur into a rush
    gulps = froth(low_hz=130, high_hz=620, count=4000, cycles=7, clear=.15)
    gurgle = froth(low_hz=580, high_hz=1250, count=3000, cycles=16, clear=clear)
    splash = froth(low_hz=1150, high_hz=4300, count=14000, cycles=22, clear=clear)
    spray = froth(low_hz=4200, high_hz=16000, count=14000, cycles=40, clear=.37)

    force_db = gulp_db + 39.5  # harder strokes drag larger pockets of air under
    low = amp(gulp_db - 5 + 0.1 * force_db) * gulps + amp(gulp_db - 6 - 0.24 * force_db) * gurgle

    top = treble(splash, above_hz=2410)  # dulls when there is less spray than usual
    top_db = 0.37 * np.clip(spray_db - splash_db - usual_spray_db, -10, 10)
    clumps = amp(1.27 * wobble(60) + 1.04 * wobble(18))  # thrown water lands in clumps, spray evenly
    middle = clumps * amp(splash_db - 1.37) * (splash - top + amp(top_db) * top)

    mist = treble(spray, above_hz=7550)  # the finest spray is heard best from close by
    mist_db = 5 - mist_loss_db_per_m * curves(DOG_DISTANCE)[0]
    hiss = amp(spray_db - 0.5) * (spray - mist + amp(mist_db) * mist)
    return low + middle + hiss


def scene():
    """The dog in the river, with far engines, whistles and wind behind it."""
    foam = churn() + trickle()
    hits = plops() + drips() + sloshes() + spatters() + slaps_and_plunges()
    return river(foam, hits) + engines() + whistles() + wind()


def record(dry):
    """Cut away the very highest treble."""
    return filtered(dry, lambda hz: hz < 14500)


dry = scene()
out = record(dry)
master(out)
```